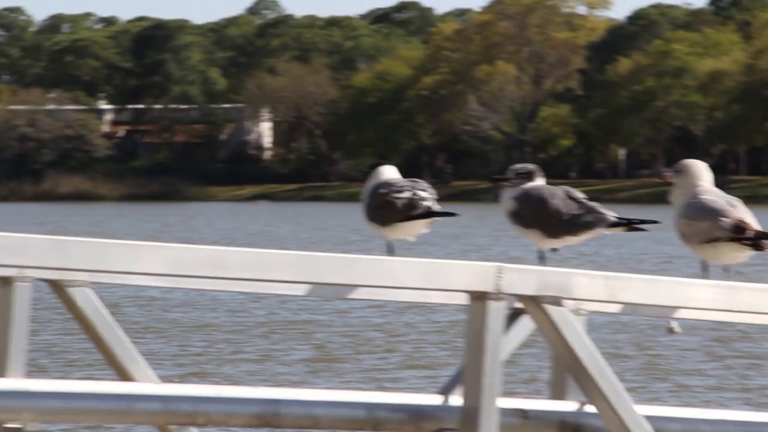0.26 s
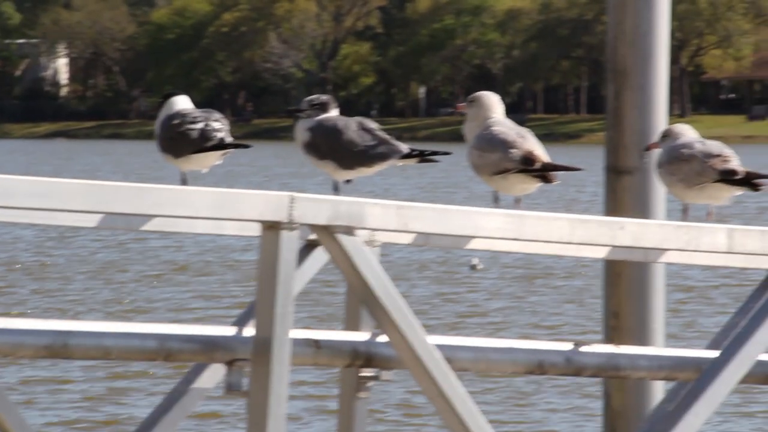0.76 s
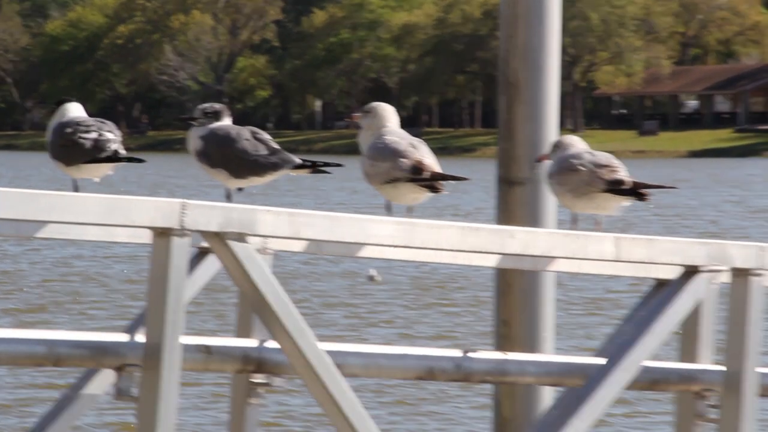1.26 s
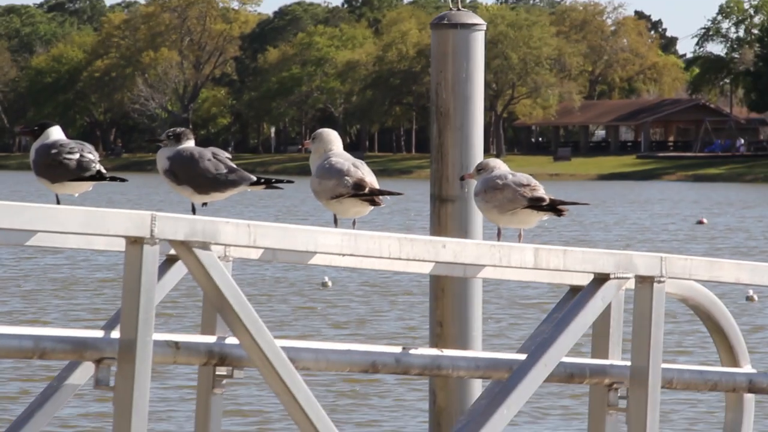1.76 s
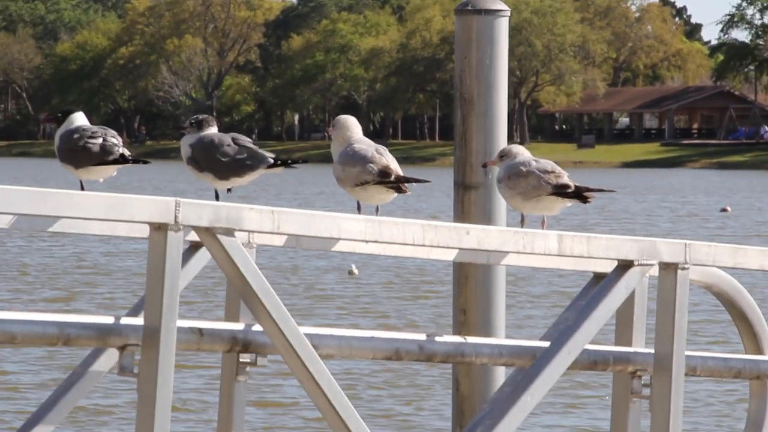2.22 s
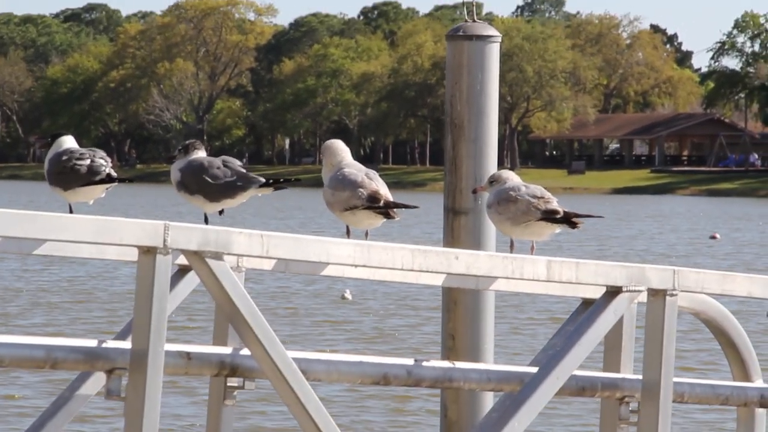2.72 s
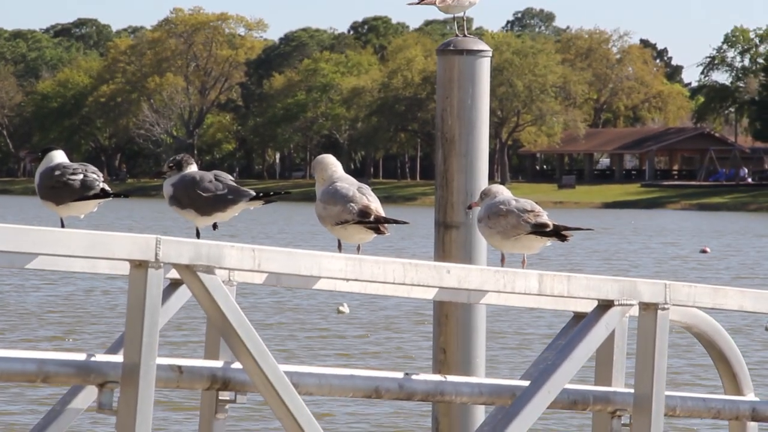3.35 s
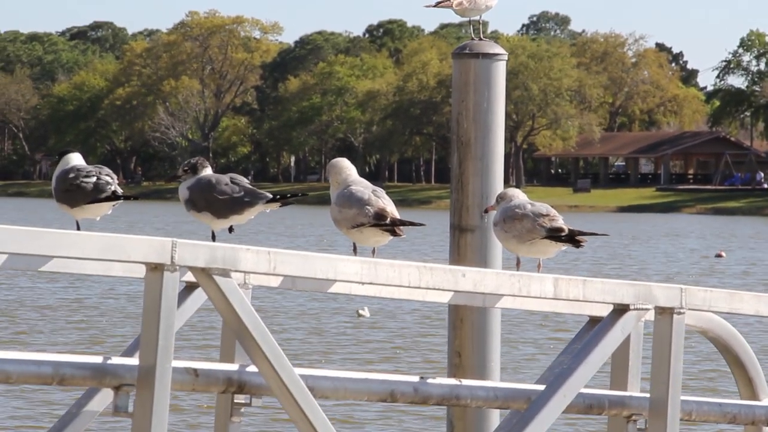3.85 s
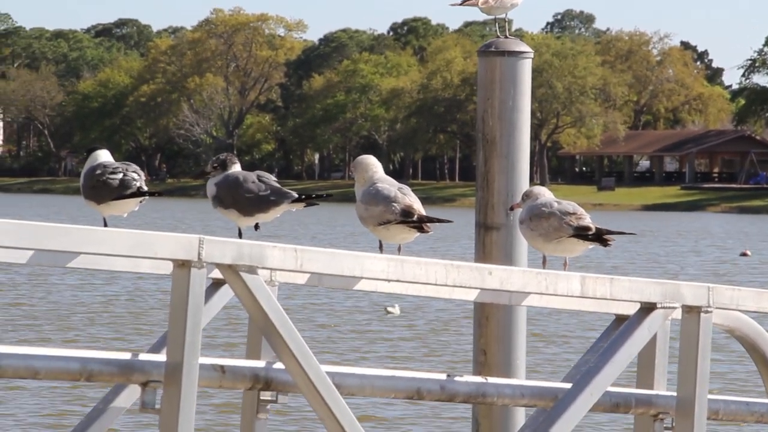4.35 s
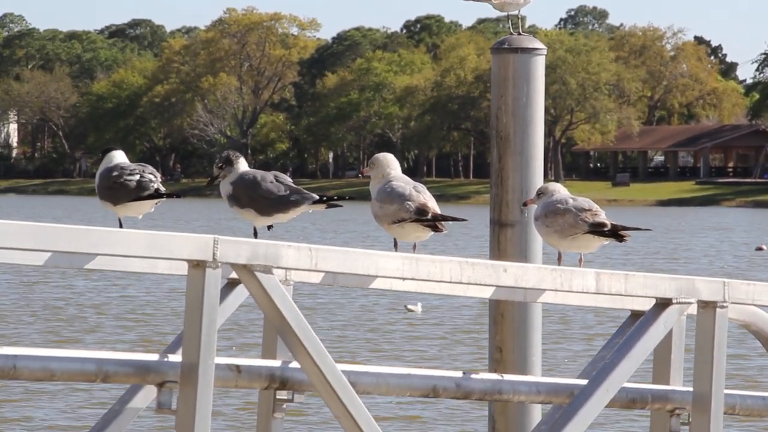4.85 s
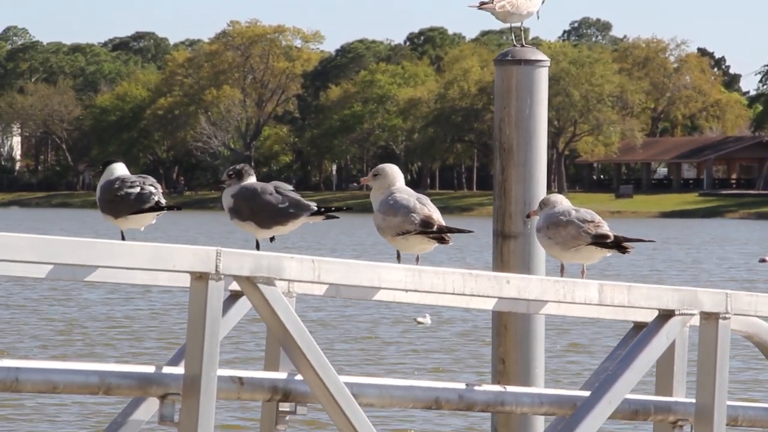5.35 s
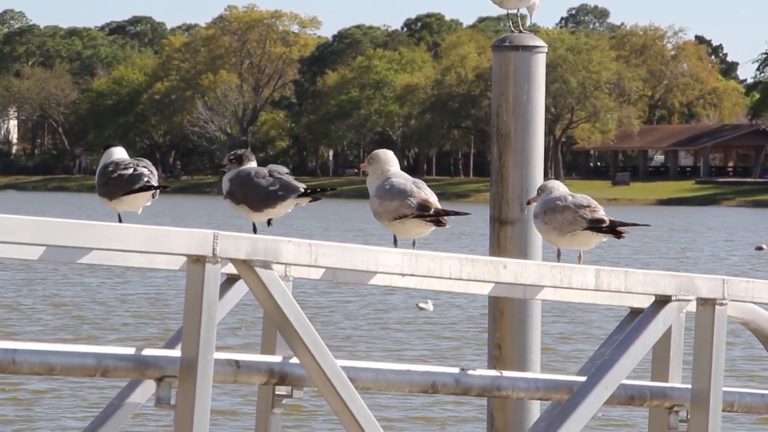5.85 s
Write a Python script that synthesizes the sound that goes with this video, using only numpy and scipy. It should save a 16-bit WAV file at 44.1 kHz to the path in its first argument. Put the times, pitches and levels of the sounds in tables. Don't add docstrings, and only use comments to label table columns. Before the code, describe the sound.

Wind buffets the microphone over distant traffic wash while lakeside birds chirp, trill and squawk, with brief metal ticks before a run of piercing short whistles.

```python
import sys
import numpy as np
from scipy import signal
from scipy.fft import rfft, irfft
from scipy.io import wavfile
from scipy.ndimage import uniform_filter1d

SR = 44100
rng = np.random.default_rng(int(sys.argv[2]) if len(sys.argv) > 2 else 0)


def dump_mix(stems):
    frames = np.atleast_2d(stems).T
    limited = np.clip(frames, -1, 1)
    pcm = np.round(limited * 32767).astype(np.int16)
    wavfile.write(sys.argv[1], SR, pcm)


def ratio_of_db(decibels):
    return 10 ** (np.asarray(decibels, float) / 20)


N = 268172

# bend of the fall, turn as share of length, (start_db, turn_db, end_db),
#                 (left minus right at start_db, at end_db), share of length the fall takes
OPENER = (3.684, .047, 3700, 3395, -14.5)
OPENER_HABIT = (1.5, .6, (-11, 0, -4), (9, 12), .6)
NEAR_PIPES = [
    (3.901, 0.049, 3805, 3253, -14),
    (4.121, .041, 3760, 3317, -17.5),
    (4.398, 0.049, 3670, 3180, -13.5),
    (4.64, .051, 3720, 3185, -14),
    (4.854, 0.049, 3690, 3210, -15.5),
]
NEAR_HABIT = (0.664, 0.85, (-11, 0, -6), (9, 12), 1.)


def near_piper():
    out = np.zeros((2, N))
    for row, habit in [(OPENER, OPENER_HABIT)] + [(row, NEAR_HABIT) for row in NEAR_PIPES]:
        curve = note(row, habit)
        add(out, *whistle(curve, (-24, -44), flick=.2, droop=.16, waver_db=.8, rise=.0065, throb=0, size=11))
    return out


CHIRPS = [
    (0.083, .046, 5260, 4200, -29),
    (3.959, 0.045, 5260, 4180, -33),
    (4.232, .045, 5080, 4180, -31.5),
]
CHIRP_HABIT = (2.3, 0.3, (0, -2.5, 0.5), (2.7, 0), 1.)


def chirper():
    out = np.zeros((2, N))
    for row in CHIRPS:
        curve = note(row, CHIRP_HABIT)
        add(out, *whistle(curve, (-45,), flick=.62, droop=.28, waver_db=2.5, rise=.002, throb=0, size=3))
    return out


BROKEN_CHIRP = (5.047, 0.047, 5280, 4200, -33)
BROKEN_HABIT = (2.6, 0.45, (2.5, -9, 0), (2.7, 0), 1.)


def turned_chirper():
    out = np.zeros((2, N))
    curve = note(BROKEN_CHIRP, BROKEN_HABIT)
    add(out, *whistle(curve, (-45,), flick=.5, droop=.2, waver_db=2.5, rise=.002, throb=0, size=3))
    return out


FAR_PIPES = [
    (4.808, 0.046, 2800, 2640, -29),
    (5.169, 0.056, 2816, 2550, -31),
    (5.556, .064, 2845, 2508, -29),
    (5.882, 0.054, 2820, 2470, -26.5),
]
FAR_HABIT = (0.55, 0.76, (-14.5, 0, -3), (-14, -6), 1.)


def far_piper():
    out = np.zeros((2, N))
    for row in FAR_PIPES:
        curve = note(row, FAR_HABIT)
        add(out, *whistle(curve, (-33,), .035, .026, waver_db=1.5, rise=.0038, throb=.82, size=1))
    return out


DISTANT_PIPE = [
    (2.852, .066, 3790, 3450, -44),
]
DISTANT_HABIT = (1.3, .6, (0, -4, -3), (8, 7), 1.)


def distant_piper():
    out = np.zeros((2, N))
    for row in DISTANT_PIPE:
        curve = note(row, DISTANT_HABIT)
        add(out, *whistle(curve, (-17,), flick=.03, droop=.2, waver_db=3, rise=.003, throb=.3, size=3))
    return out


# start_s, length_s, top_hz, peak_db, gape as a factor on the throat
YELPS = [
    (.264, .121, 560, -24.5, .94),
]
CRIES = [
    (5.93, .086, 652, -37.5, 1.06),
]
WHOOPS = [
    (3.655, .11, 552, -31.5, 1.08),
]
MEWS = [
    (4.205, .105, 356, -37, .75),
    (4.4, .16, 556, -43, .76),
]
HUMS = [
    (.4, .115, 572, -47, 1.05),
    (.515, .175, 317, -43, .8),
    (3.49, .07, 1470, -53, 1.45),
    (5.74, .17, 1005, -45.5, 1.5),
]
SIGHS = [
    (3.72, .04, 550, -41, .78),
    (3.77, .12, 480, -55, .96),
]
PARTING = [
    (6.001, .1, 505, -49, .81),
]
# start below top (share), end below top (share), top as share of length,
#                flatness of the arch, edge below peak_db, opening of the gape (share)
YELP_HABIT = (.36, .33, .42, 1.55, 20, .1)
CRY_HABIT = (.44, .3, .56, 3.8, -1.5, .1)
WHOOP_HABIT = (.26, .1, .6, 2.4, 14, .1)
MEW_HABIT = (.13, .2, .42, 1.9, 5, .1)
HUM_HABIT = (.03, .08, .3, 3., 3, .1)
SIGH_HABIT = (.01, .15, .02, .4, -6, .1)
PARTING_HABIT = (.01, .165, .02, .26, -15, -.1)


def gulls():
    out = np.zeros((2, N))
    for rows, habit in ((YELPS, YELP_HABIT), (CRIES, CRY_HABIT), (WHOOPS, WHOOP_HABIT), (MEWS, MEW_HABIT),
                        (HUMS, HUM_HABIT), (SIGHS, SIGH_HABIT), (PARTING, PARTING_HABIT)):
        for row in rows:
            add(out, *squawk(arch(row, habit)))
    return out


# pitch_hz, level_db
THROAT = [(300, -46), (1000, -22.5), (1300, 3.5), (1650, -2), (2200, 5.5), (2450, -5.5), (2750, -10.5),
          (3300, -30), (5000, -24), (7000, -24), (8500, -50)]


def squawk(curve):
    start, t, (hz, db, pan_db, gape) = spread(curve)
    turns = np.cumsum(hz * (1 + .00094 * drift(len(t), .0021))) / SR
    voice = 0
    for k in range(1, 16):
        place_hz = k * hz / gape
        flutter_db = np.where(place_hz > 3000, 7, 2) * drift(len(t), .003)
        partial = np.cos(2 * np.pi * (k * turns + rng.random()))
        voice = voice + ratio_of_db(read(THROAT, place_hz) + flutter_db) * partial
    voice = evened(voice) * ratio_of_db(db) * signal.windows.tukey(len(t), .15)
    return start, voice * sides(np.mean(pan_db))


def arch(row, habit):
    start, length, top_hz, db, gape = row
    low_start, low_end, top, flat, edge_db, opens = habit
    u = np.linspace(0, 1, 16)
    away = np.interp(u, (0, top, 1), (1, 0, 1)) ** flat
    hz = top_hz * (1 - np.where(u < top, low_start, low_end) * away)
    pan_db = 4.5 + 0 * u
    return np.transpose([start + length * u, hz, db - edge_db * away, pan_db, gape * (1 + opens * (u - .5))])


# start_s, length_s, peak_db, pitch_hz
TRILL = [
    (.17, 0.15, -58, 4170),
    (0.44, 0.16, -46, 4290),
    (0.585, .25, -45, 4400),
    (1.27, .21, -46, 4280),
]


def triller():
    out = np.zeros((2, N))
    for row in TRILL:
        start, t, (db, hz) = spread(phrase(*row))
        beat = np.cos(np.pi * np.cumsum(59 * (1 + .06 * drift(len(t), .03))) / SR) ** 4
        tone = np.sin(2 * np.pi * np.cumsum(hz * (1 + .019 * drift(len(t), .001))) / SR)
        pulses = evened(tone * (.15 + beat))
        add(out, start, placed(pulses * ratio_of_db(db - 1), .3, size=0))
    return out


def phrase(start, length, db, hz):
    top, edge_db, sag = .4, -10, .07
    return [(start, db + edge_db, hz),
            (start + top * length, db, hz * (1 - top * sag)),
            (start + length, db + edge_db, hz * (1 - sag))]


def note(row, habit):
    start, length, top_hz, end_hz, db = row
    bend, turn, swell_db, pan_db, settle = habit
    u = np.linspace(0, 1, 12)
    hz = top_hz - (top_hz - end_hz) * np.minimum(u / settle, 1) ** bend
    level_db = db + np.interp(u, (0, turn, 1), swell_db)
    return np.transpose([start + length * u, hz, level_db, np.interp(u, (0, 1), pan_db)])


def whistle(curve, overtones_db, flick, droop, waver_db, rise, throb, size):
    start, t, (hz, db, pan_db) = spread(curve, lead=.008, tail=.00657)
    left = t[-1] - t
    onset = .059 * np.exp(-t / .0057) - flick * np.exp(-t / .00169)
    hz = hz * (1 + onset - droop * np.exp(-left / .0019))
    turns = 2 * np.pi * np.cumsum(hz * (1 + .002 * drift(len(t), .002))) / SR
    tone = np.sin(turns) * np.tanh(t / rise) * np.tanh(left / .004)
    for k, level_db in enumerate(overtones_db):
        steady_db = level_db - 1.1 * (db - db.max()) + 4.9 * drift(len(t), .0031)
        smear = 1 + k * 1.5 * drift(len(t), .0006)
        overtone = np.sin((k + 2) * turns) * np.tanh(t / .019) * np.tanh(left / .0003)
        tone = tone + ratio_of_db(steady_db) * smear * overtone
    tone *= 1 + throb * np.exp(-t / .12) * np.sin(2 * np.pi * 76.8 * t)
    level = np.sqrt(2) * ratio_of_db(db + waver_db * drift(len(t), .0016))
    return start, placed(tone * level, pan_db, size)


def birds():
    near, chirps, distant = near_piper(), chirper(), distant_piper()
    far = turned_chirper() + far_piper() + gulls() + triller()
    sent = ratio_of_db(-15.5) * near[0] + ratio_of_db(-15) * chirps[0] + ratio_of_db(-8) * far.mean(0) + ratio_of_db(1.5) * distant[0]
    direct = near + ratio_of_db(1) * chirps + far + ratio_of_db(-1.5) * distant
    return direct + sides(7) * turning_shore(sent)


def turning_shore(x):
    angle = 2 * np.pi * np.arange(N) / SR / .87
    return shore(x * np.cos(angle)) + shore(x * np.sin(angle))


# pitch_hz, t60_s
SHORE = [(1000, .8), (2500, 0.46), (3400, 0.52), (5200, .45), (6600, 0.3), (12000, 0.029)]


def shore(x):
    taps = np.zeros((2, SR // 2))
    slots = np.arange(round(.004 * SR), SR // 2 - 24, 24)
    at = slots + rng.integers(0, 24, (2, len(slots)))
    echoes = rng.choice([-1., 1.], at.shape) * ratio_of_db(4.5 * rng.standard_normal(at.shape))
    np.put_along_axis(taps, at, echoes, 1)
    taps[1] = .96 * taps[1] + .35 * np.roll(taps[0], 11)
    hz, t, z = signal.stft(taps, SR, nperseg=256)
    lumps = uniform_filter1d(rng.standard_normal(z.shape[1:]), size=3, axis=0)
    lumps = evened(uniform_filter1d(lumps, size=6, axis=1))
    fade_db = 60 * t / read(SHORE, hz)[:, None]
    tail = signal.istft(z * ratio_of_db(4 * lumps - fade_db), SR, nperseg=256)[1]
    return signal.fftconvolve(x[None], tail / np.linalg.norm(tail[0]), axes=1)[:, :N]


# start_s, peak_db, centre_hz, width_hz, length_s
SCUFFS = [(0.933, -42.5, 4970, 8700, 0.017), (1.086, -44.5, 5500, 9000, 0.039),
          (1.254, -49, 7000, 9000, .012), (2.609, -42, 6000, 3000, .005), (2.725, -43, 4830, 1500, .006),
          (2.995, -32.5, 6170, 2500, 0.0042), (3, -44, 10000, 8000, .004), (3.038, -37, 5000, 700, 0.027),
          (3.046, -24.5, 2000, 4070, 0.002), (3.0894, -36, 5000, 3000, .004),
          (3.0897, -40, 12100, 5000, 0.0027), (3.096, -36, 12400, 5000, 0.0024),
          (3.113, -44, 7100, 2500, 0.014), (3.119, -38.5, 3160, 1200, 0.017)]


def rail():
    out = np.zeros((2, N))
    t, f = np.arange(2048) / SR, np.fft.rfftfreq(2048, 1 / SR)
    for start, db, hz, width, length in SCUFFS:
        burst = irfft(rfft(rng.standard_normal((2, 2048))) * np.exp(-((f - hz) / width) ** 2))
        burst = evened(burst + .18 * np.roll(burst[::-1], 4, axis=1))
        envelope = np.minimum(t / .00045, 1) * np.exp(-(t / length) ** 2)
        add(out, start, ratio_of_db(db + 2.5) * burst * envelope)
    return out


# pitch_hz, level_db
RASP_COLOUR = [(1500, -15), (2600, -4.5), (4000, 0), (5500, -6.5), (7300, -9), (8500, -15.5), (12000, -24)]


def rasp():
    grain = ratio_of_db(13.5 + 2 * drift(N, .0043))
    return grain * stirs() * noise(RASP_COLOUR, ((1, -.3), (2, .14)), patchy_db=1.5)


# peak_s, build_up_s, peak_db
RASP = [(.15, .15, -59), (.34, 0.17, -54.5), (.6, 0.56, -60.5), (.796, .18, -52.5), (.95, 0.093, -59),
        (1.1, 0.16, -57.5), (1.41, 0.36, -59), (2.996, .012, -58), (3.126, 0.3, -65), (3.25, .05, -66),
        (3.7, 0.048, -54.5), (4.27, 0.097, -55), (5.6, 0.031, -61), (5.79, 0.22, -60), (5.95, .15, -61)]


def stirs():
    peak, build, db = np.array(RASP).T[..., None]
    late = np.arange(N) / SR - peak
    away = np.maximum(-late / build, late / (.34 * build))
    level = ratio_of_db(db - 11 * np.minimum(away, 5) ** 2)
    return np.sqrt((level ** 2).sum(0))


# pitch_hz, level_db
THUD = [(15, -21), (30, -6.5), (50, 4.5), (70, -5.5), (95, -20), (200, -63), (600, -120)]
FLUTTER = [(30, -40), (55, -30), (80, 3), (130, 0.5), (190, -10), (280, -23.5), (500, -47), (2000, -120)]
# peak_s, dying_s, peak_db, left minus right_db
THUD_GUSTS = [(.12, 0.16, -25, -8), (.32, 0.043, -29.5, 7), (.52, 0.15, -22, 18), (.98, 0.2, -33, 14),
              (1.2, 0.028, -28, 12), (1.34, 0.077, -22.5, 20), (1.45, 0.043, -23, 2), (1.75, 0.077, -26, 5),
              (1.95, 0.098, -29.5, 8), (2.32, 0.24, -32, 12), (2.59, 0.26, -26, 13), (2.8, 0.45, -24, 1),
              (3.02, .08, -23, 11), (3.25, 0.042, -24, 13), (3.5, .06, -34, -9), (3.59, 0.098, -24, -3),
              (3.86, 0.024, -23.5, -2), (4., 0.41, -26, -5), (4.499, 0.27, -26.5, -3), (4.8, .1, -20.5, 20),
              (5.12, 0.11, -34, -17), (5.44, 0.28, -27.5, 7), (5.74, 0.077, -24.5, 9), (5.94, 0.11, -25, 6),
              (6.07, .05, -26, 8)]
FLUTTER_GUSTS = [(.22, 0.021, -22.5, 0), (.52, .2, -32, 6), (1.2, 0.015, -29, 0), (1.29, 0.17, -25.5, -5),
                 (1.75, 0.048, -33.5, -9), (1.93, 0.069, -33.5, -5), (2.17, 0.12, -31, -15),
                 (2.32, 0.013, -20, -11), (2.59, 0.28, -30.5, -2), (2.95, 0.069, -25, -2.5),
                 (3.17, .05, -23.5, -12), (3.32, 0.032, -25.5, -17), (3.49, 0.046, -21, -5),
                 (3.82, 0.17, -25.5, -3), (3.93, 0.015, -23.5, -9), (4.2, .09, -29, -19),
                 (4.49, 0.2, -31, -10), (4.85, 0.24, -23.5, -3.5), (4.988, 0.063, -15.5, -24),
                 (5.16, 0.2, -22.5, -16), (5.34, 0.1, -19, -13), (5.452, 0.16, -20.5, -24),
                 (5.65, 0.025, -29, -9), (5.81, 0.061, -24.5, -18), (5.95, 0.14, -33, -11)]


def wind():
    out = 0
    for colour, rows, breeze_db in ((THUD, THUD_GUSTS, -35.5), (FLUTTER, FLUTTER_GUSTS, -34)):
        lumps_db = 1.7 * np.array([drift(N, .022), drift(N, .022)])
        out = out + noise(colour) * gusts(rows, breeze_db) * ratio_of_db(lumps_db - .36)
    return out


def gusts(rows, breeze_db):
    rise_s = .051
    t, power = np.arange(0, N + 64, 64) / SR, ratio_of_db(2 * breeze_db)
    for peak, dying, db, pan_db in rows:
        rising = np.exp(-((t - peak) / rise_s) ** 2)
        shape = np.where(t < peak, rising, np.exp(-np.maximum(t - peak, 0) / dying))
        power = power + sides(2 * pan_db) * (ratio_of_db(db) * shape) ** 2
    return np.sqrt([2 * np.interp(np.arange(N) / SR, t, port) for port in power])


# pitch_hz, level_db per Hz
WASH = [(60, -52), (200, 3.5), (300, -2), (450, -5.5), (700, -4), (1080, -3.5), (1300, -9.5), (1700, -14.5),
        (2200, -19), (3500, -21.5), (6000, -25.5), (8000, -31.5), (16000, -33.5)]
# pitch_hz, likeness (-1 to 1)
WASH_SAME = [(200, -0.0094), (400, -0.29), (800, 0.052), (1500, -0.011), (3000, -0.11), (6500, -0.35),
             (15000, 0.14)]


def wash():
    return ratio_of_db(-34) * noise(WASH, WASH_SAME, patchy_db=1)


def noise(colour, same=((1, 0.), (2, 0.)), patchy_db=0.):
    frames, hz = N // 512 + 5, np.fft.rfftfreq(2048, 1 / SR)
    a, b, c, d, patches = rng.standard_normal((frames, 1025, 5)).T
    patches = evened(uniform_filter1d(uniform_filter1d(patches, 20, 0), 8, 1))
    like = np.clip(read(same, hz), -1, 1)[:, None]
    left = a + 1j * b
    right = like * left + np.sqrt(1 - like ** 2) * (c + 1j * d)
    z = np.array([left, right]) * ratio_of_db(read(colour, hz)[:, None] + patchy_db * patches)
    return evened(signal.istft(z, nperseg=2048, noverlap=1536)[1][:, :N])


def evened(x):
    return x / np.sqrt(np.mean(x ** 2) + 1e-20)


def read(points, hz):
    f, value = np.transpose(points)
    return np.interp(np.log(hz + 1), np.log(f + 1), value)


def drift(count, seconds):
    size = max(round(seconds * SR), 1)
    return evened(uniform_filter1d(uniform_filter1d(rng.standard_normal(count), size), size))


def spread(rows, lead=0., tail=0.):
    s, *columns = np.transpose(rows)
    t = np.arange(s[0] - lead, s[-1] + tail, 1 / SR)
    return t[0], t - t[0], [np.interp(t, s, c) for c in columns]


def sides(pan_db):
    left = ratio_of_db(np.clip(pan_db, -40, 40)) * np.ones(1)
    return np.array([2 * left, 2 + 0 * left]) / (1 + left)


def placed(sound, pan_db, size):
    left, right = sound * sides(pan_db)
    return np.array([left, np.roll(right, size)])


def add(mix, start, sound):
    part = mix[:, round(start * SR):][:, :sound.shape[1]]
    part += sound[:, :part.shape[1]]


def scene():
    return birds() + rail() + rasp() + wind() + wash()


def top_cut(x):
    return signal.sosfilt(signal.butter(12, 15830, fs=SR, output="sos"), x)


def record(dry):
    edge = signal.firwin(511, 15740, window=("kaiser", 9), fs=SR)
    mix = signal.oaconvolve(dry, edge[None], "same")
    return top_cut(mix)


dry = scene()
out = record(dry)
dump_mix(out)
```